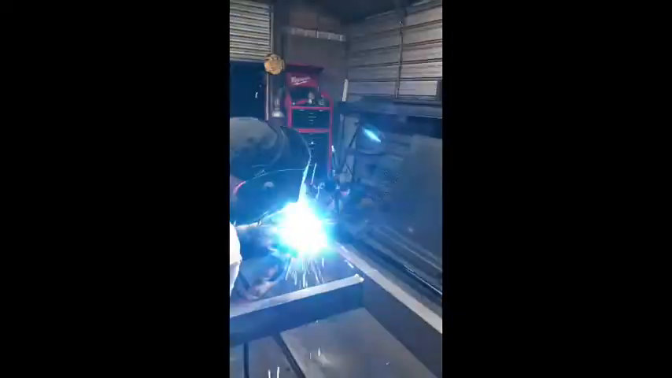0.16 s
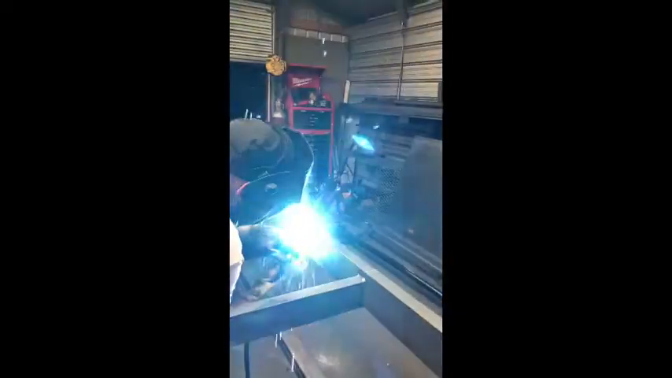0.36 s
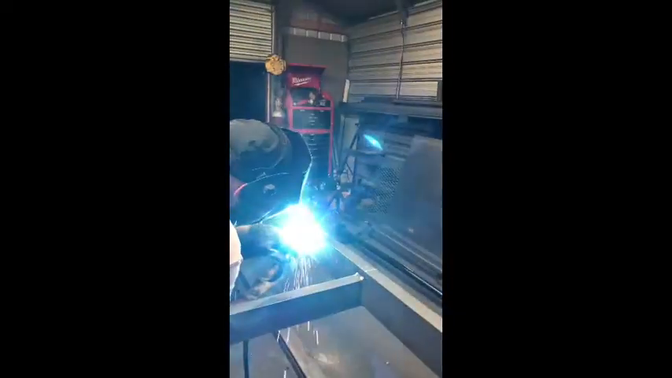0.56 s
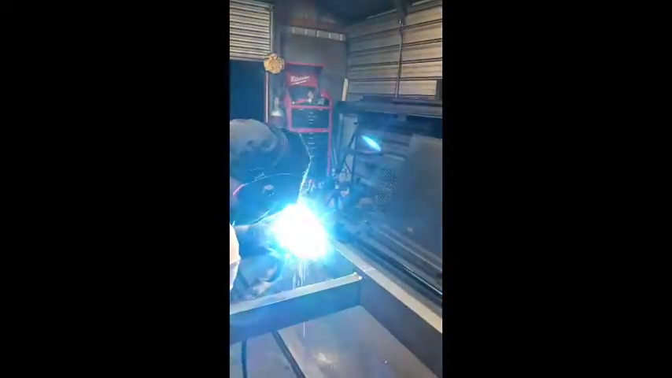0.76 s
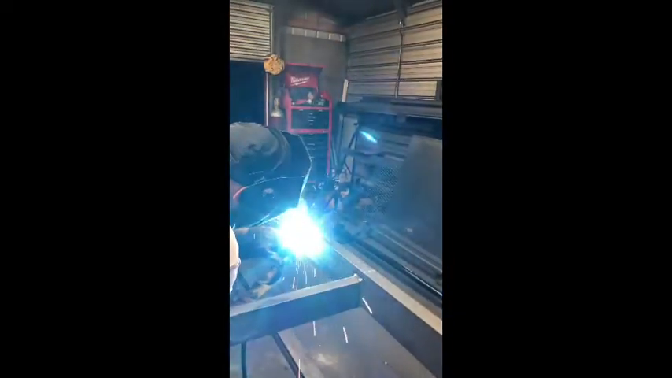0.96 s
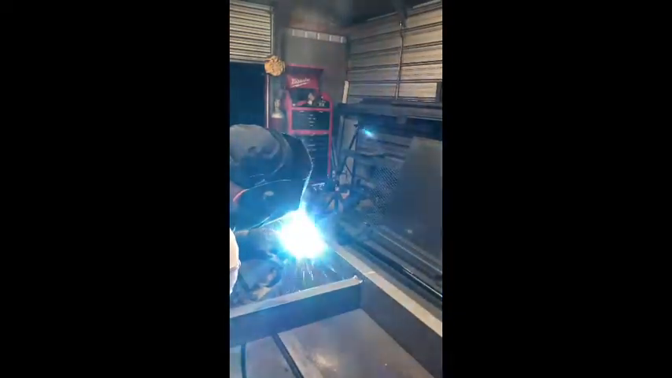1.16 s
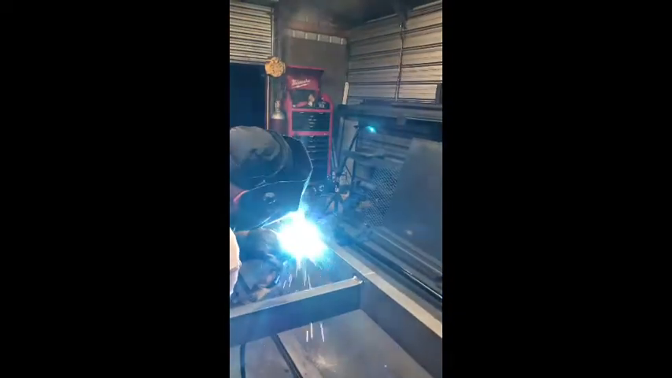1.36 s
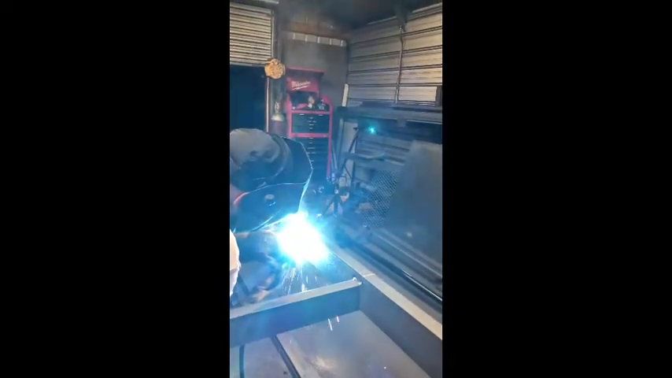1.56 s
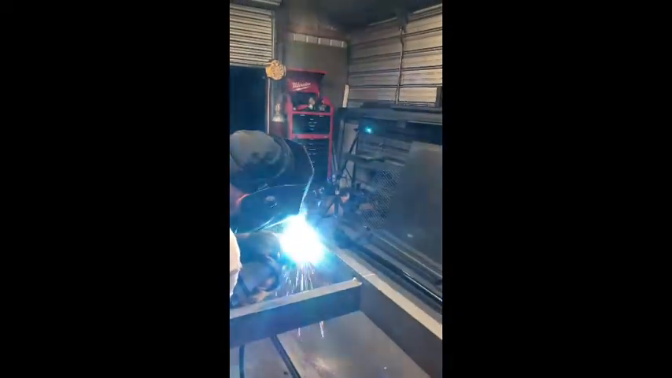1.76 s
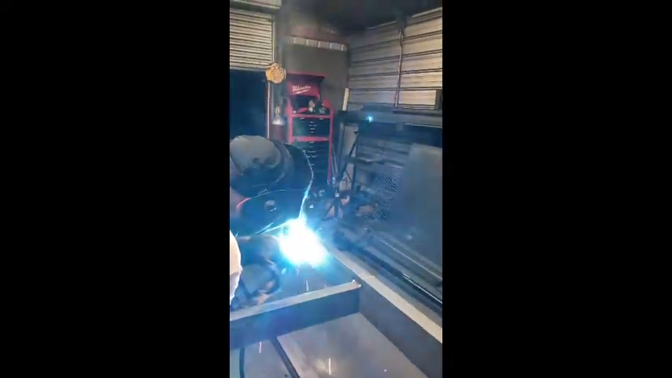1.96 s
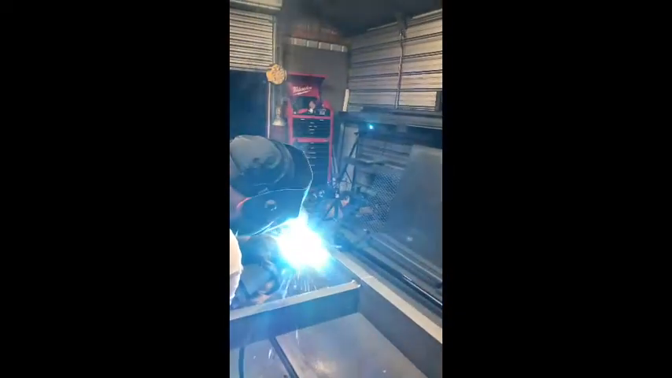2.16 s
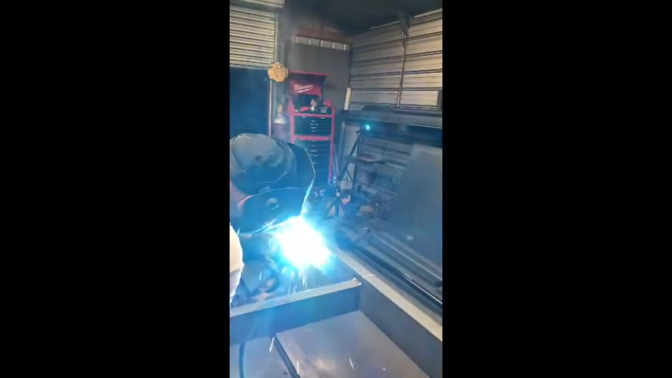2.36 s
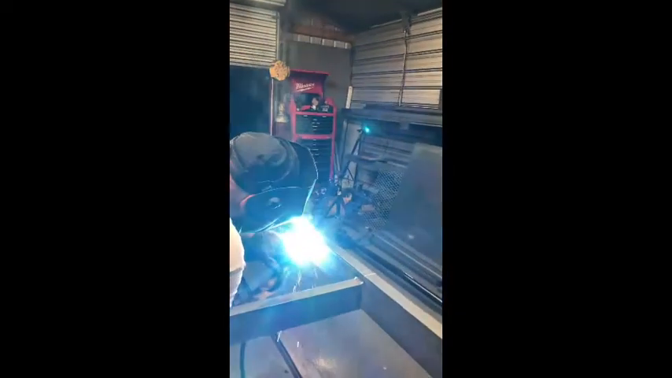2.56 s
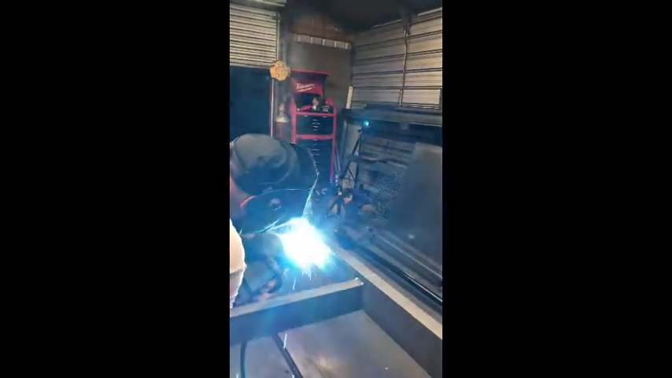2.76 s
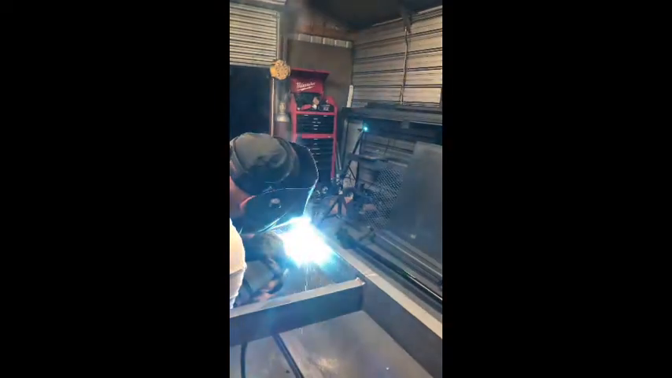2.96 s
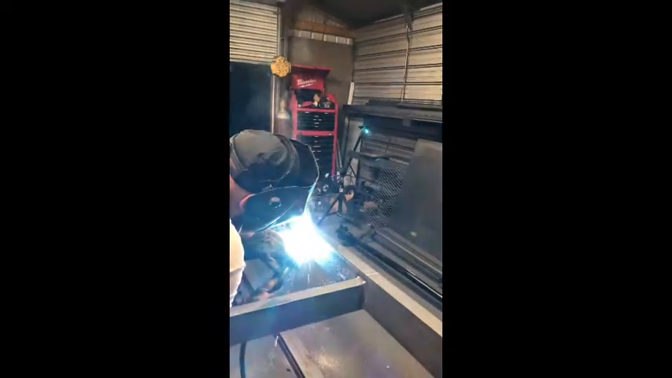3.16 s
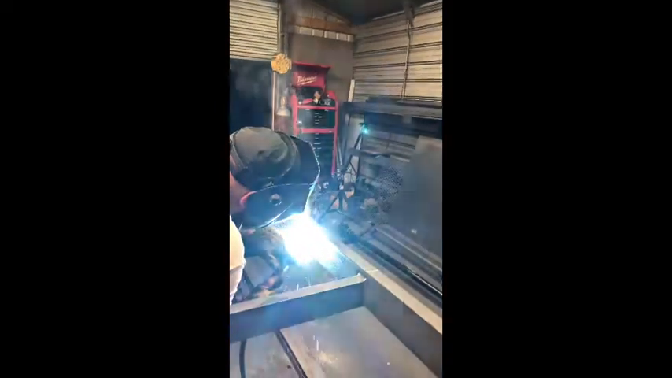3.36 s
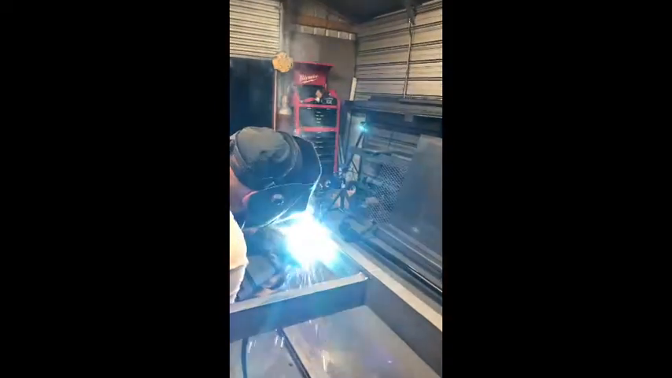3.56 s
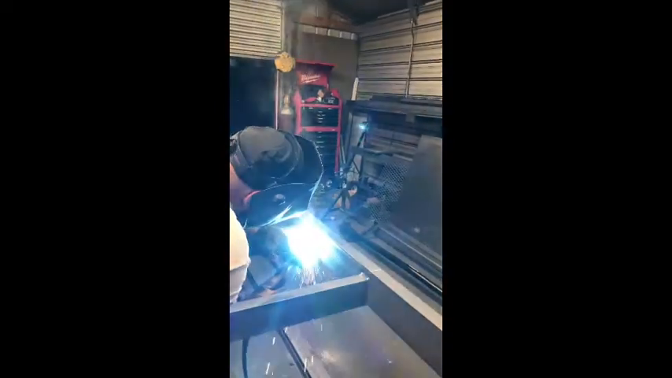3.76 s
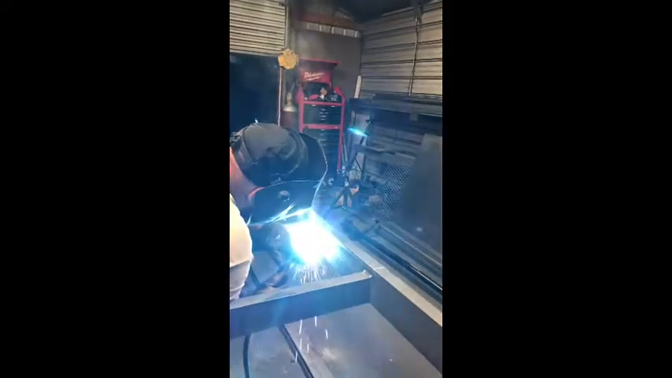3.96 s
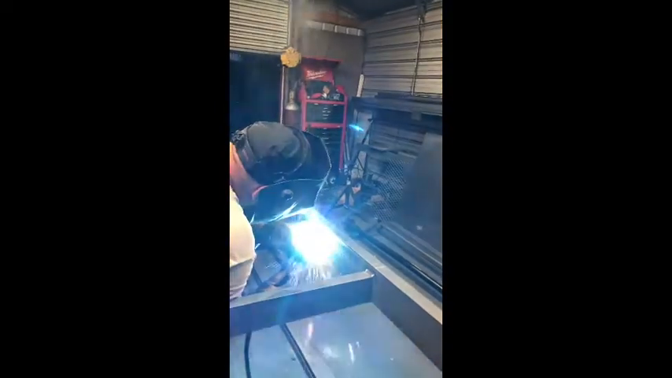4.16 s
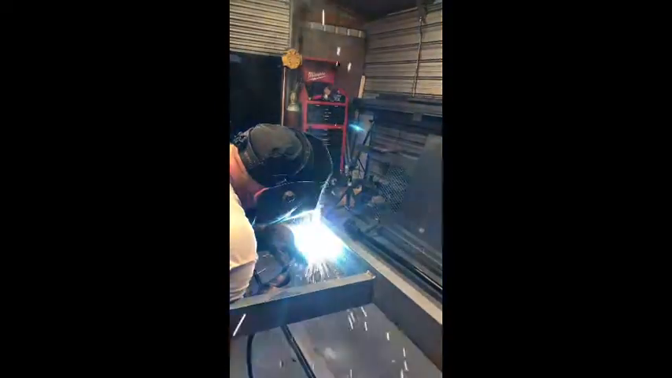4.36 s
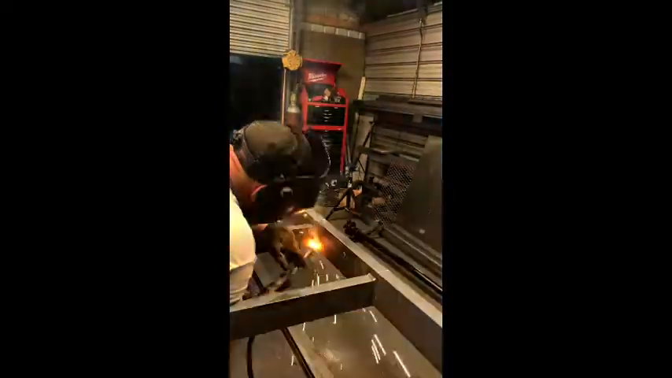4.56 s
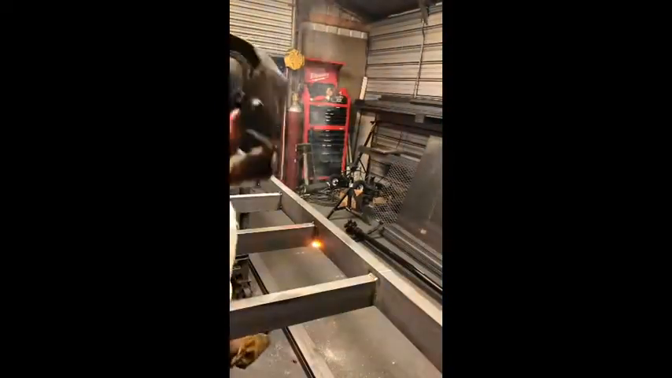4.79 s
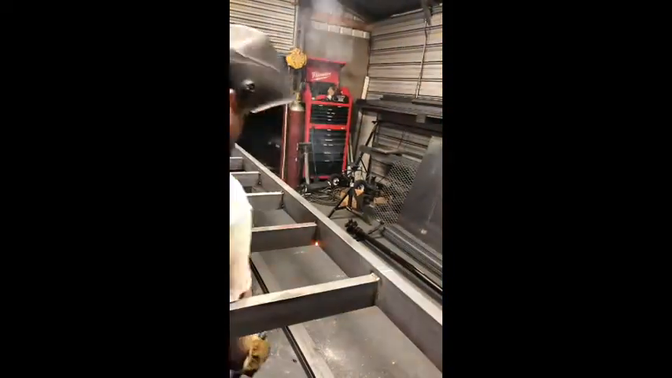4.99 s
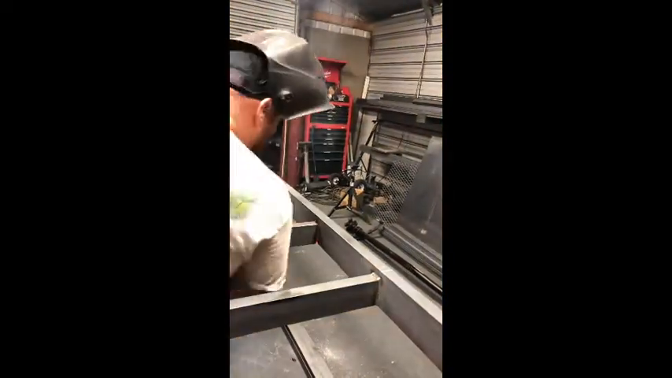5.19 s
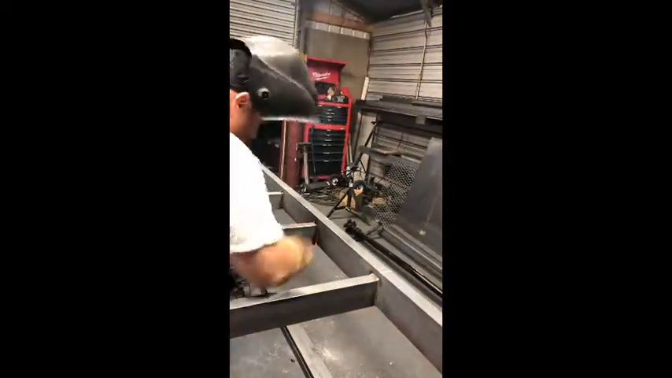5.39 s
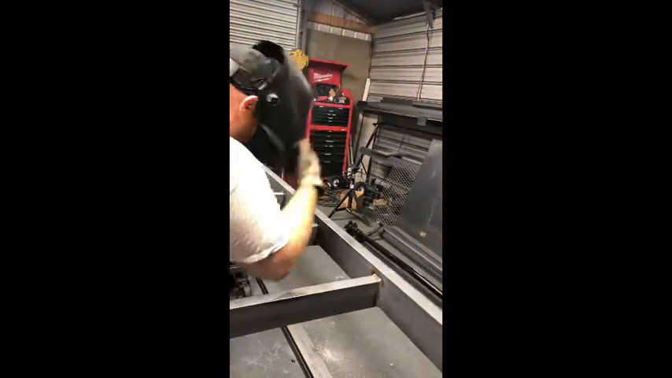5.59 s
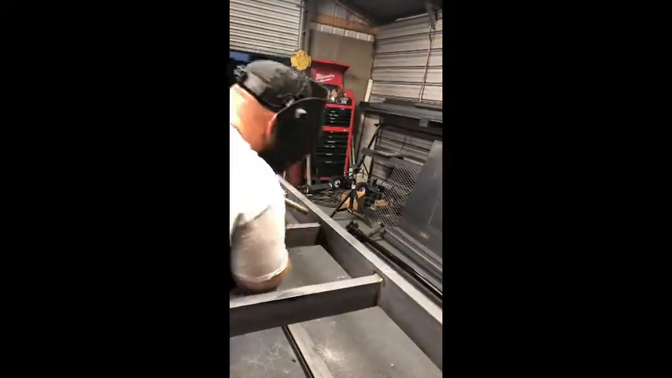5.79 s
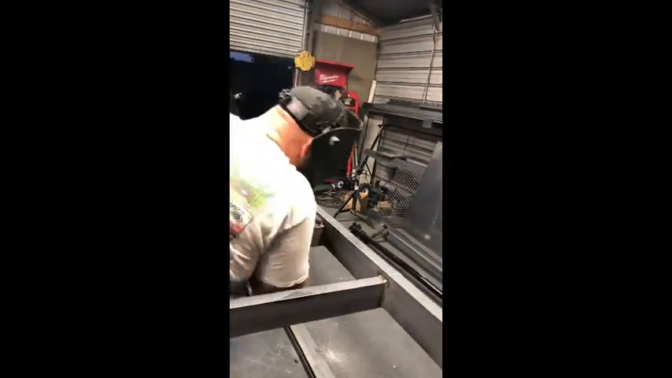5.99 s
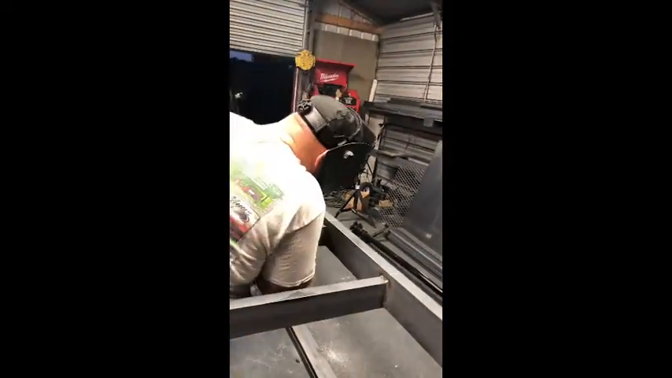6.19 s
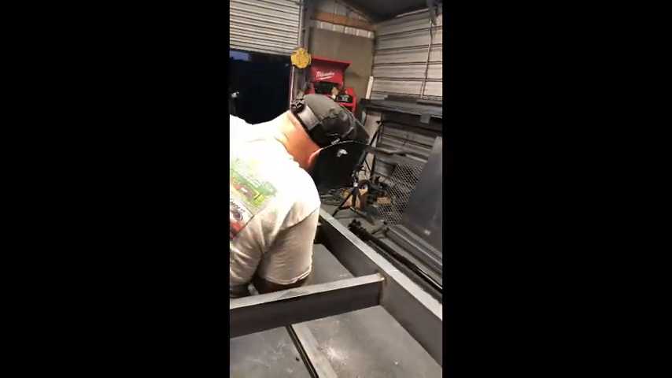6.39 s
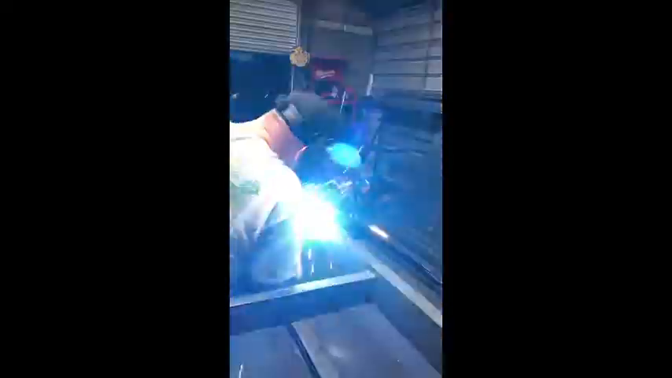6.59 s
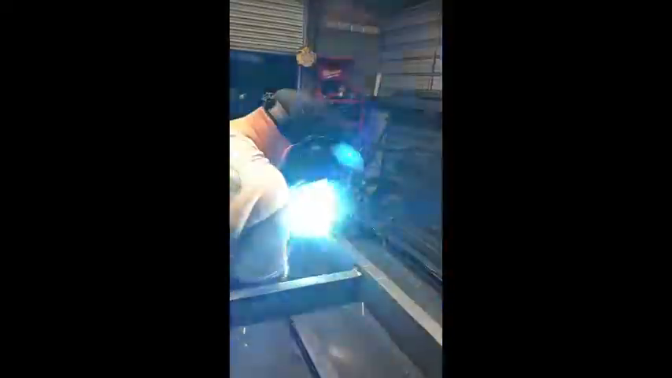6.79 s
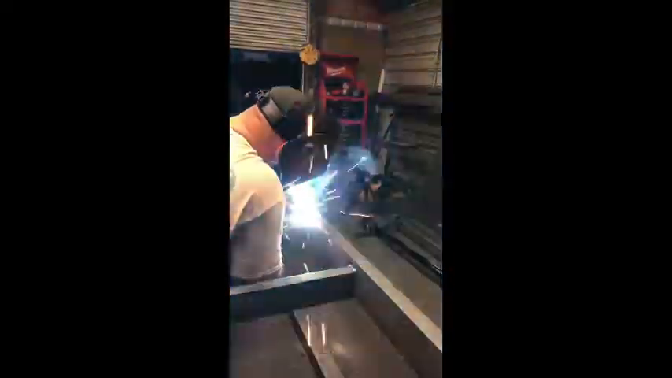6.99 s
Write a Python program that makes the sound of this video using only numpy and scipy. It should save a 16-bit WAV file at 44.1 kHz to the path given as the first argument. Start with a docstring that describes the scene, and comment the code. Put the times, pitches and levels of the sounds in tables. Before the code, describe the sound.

A welding arc is already burning on steel tubing at the start: a bright, dense sizzle with rapid, uneven pops and fine spatter, flaring and faltering slightly. A fan motor hums low underneath. Soft, dull bumps touch the microphone right at the start and at about 0.4 seconds. The crackle continues steadily, a little louder around 3 seconds, with another soft bump just before it stops at about 4.6 seconds. A brief puff of hiss follows at 4.7 seconds. In the pause, the fan's wavering hum and rush of air become more noticeable, and clothing rustles very faintly between 5 and 5.5 seconds. At about 6.5 seconds the arc strikes again and the hum recedes. This second weld sputters more unevenly and lasts until the end, around 7 seconds. The workshop adds a short, slight reverberation.

```python
"""MIG welding a steel frame

An arc sizzles along a joint of a tube frame in a workshop, stops, and strikes at another joint.
The wire shorts into the pool in quick uneven pops amid fine spatter, coloured by the steel around it.
A fan motor hums throughout, louder between the welds, and a few soft bumps reach the microphone.
A short hiss and faint rustles of clothing follow the first weld."""
import sys
import numpy as np
from scipy import signal
from scipy.fft import rfft, irfft, next_fast_len
from scipy.io import wavfile
from scipy.ndimage import map_coordinates

SR = 44100
rng = np.random.default_rng(int(sys.argv[2]) if len(sys.argv) > 2 else 0)


def generate_wav(signal):
    """Clip the signal to [-1, 1] and save it as 16-bit WAV at the path in sys.argv[1]."""
    frames = np.transpose(np.atleast_2d(signal))
    scaled = np.clip(frames, -1, 1) * 32767
    pcm = np.round(scaled).astype(np.int16)
    wavfile.write(sys.argv[1], SR, pcm)


N = 310464


def amp(db):
    """Decibels to gain."""
    return 10 ** (np.asarray(db) / 20)


def unit(x):
    """Scale to rms 1."""
    return x / np.sqrt(np.mean(x ** 2) + 1e-20)


def along(points, hz):
    """Interpolate (frequency, value) points on a log axis."""
    point_hz, values = np.transpose(points)
    return np.interp(np.log(hz + 1), np.log(point_hz), values)


def tracks(rows, t):
    """Interpolate (time, values...) rows: one curve per value column."""
    times_s, *columns = np.transpose(rows)
    return [np.interp(t, times_s, column) for column in columns]


def bell(t, sigma_s):
    """Gaussian of height 1 at t = 0."""
    return np.exp(-(t / sigma_s) ** 2 / 2)


def wobble(rate_hz):
    """Smooth random curve through rate_hz knots a second."""
    knots = rng.standard_normal(int(N * rate_hz / SR) + 4)
    return map_coordinates(knots, [np.arange(N) * rate_hz / SR])


def filtered(x, response):
    """Zero-phase filter with gain response(hz)."""
    size = next_fast_len(N + 8192)
    return irfft(rfft(x, size) * response(np.fft.rfftfreq(size, 1 / SR)), size)[..., :N]


def noise(spectrum):
    """Coloured noise, rms 1."""
    return unit(filtered(rng.standard_normal(N), lambda hz: amp(along(spectrum, hz))))


def clicks(rate_hz, scatter, spread_db, count):
    """Impulses of log-normal spacing and size, rms 1."""
    gap, size = rng.standard_normal((count, 2)).T
    periods = np.exp(scatter * gap - scatter ** 2 / 2)
    at = (np.cumsum(periods) * SR / rate_hz).astype(int)
    gains = amp(spread_db * np.minimum(size, 2))
    train = np.bincount(at[at < N], gains[at < N], N)
    return unit(train - train.mean())


def crackle(pop_db, hiss_db, flutter_db):
    """Short-circuit pops, fine spatter and arc hiss, all fluttering with the pool."""
    t = np.arange(SR // 50) / SR
    burst = rng.standard_normal(N)
    snaps = clicks(rate_hz=115, scatter=.45, spread_db=1.5, count=2000)
    # each snap is followed by a brief flare as the arc relights
    relight_t60_s = 0.014
    relight_power = signal.fftconvolve(np.maximum(snaps, 0) ** 2, amp(-60 * t / relight_t60_s) ** 2)[:N]
    pops = unit(0.43 * snaps + unit(np.sqrt(np.abs(relight_power)) * burst))
    spatter = clicks(rate_hz=2600, scatter=.8, spread_db=1.5, count=50000)
    mix = spatter + amp(pop_db) * pops + amp(hiss_db) * rng.standard_normal(N)
    return unit(mix * amp(flutter_db * wobble(36)))


# arc colour: (frequency [Hz], gain [dB])
ARC_SPECTRUM = [(60, -17), (200, -14.5), (350, -13), (600, -15), (1000, -8), (2000, -8.5), (3000, -2.5),
                (4500, -1), (7000, 1), (10000, 1.5), (12500, -3.5), (15500, -8)]
# peaks and hollows of the steel at each joint: (centre [Hz], width [Hz], gain [dB])
FIRST_JOINT = [(1095, 56, 4.5), (1496, 160, 8.5), (2050, 154, -4.5), (3315, 550, 6), (4115, 240, 5),
               (4680, 570, 9), (5900, 520, -2.5), (8110, 690, 3.5), (8970, 340, -2), (10410, 800, 4.5),
               (12150, 750, -2), (14300, 990, 5.5)]
SECOND_JOINT = [(1090, 130, -1.5), (1660, 120, 4.5), (2000, 160, -4.5), (3310, 150, 5), (4070, 170, 5.5),
                (4850, 350, 5.5), (7300, 490, 3), (8300, 300, 3), (9700, 450, 2.5)]
# torch travel: (time [s], peak tuning [ratio], peak strength [ratio], top fizz [dB])
FIRST_TORCH = [(0, 0.95, 0.71, 3), (0.9, 0.97, 0.97, 2), (1.7, 0.99, 1.13, 2.5), (2.6, 1.025, 0.93, -1.5),
               (3.4, 1.013, 1.02, -5.5), (4.0, 1.02, 0.56, 3.5), (4.55, 1.01, 0.78, 1.5)]
SECOND_TORCH = [(6.44, 1, 0.96, 3.8), (7.04, 0.98, 0.84, 2.5)]


def steel(x, joint, torch):
    """The joint colours the arc; its peaks shift and flatten as the torch travels."""
    hz, t, spectra = signal.stft(x, SR, nperseg=512)
    hz = hz[:, None]
    tuning, strength, fizz_db = tracks(torch, t)
    peaks_db = sum(db * np.exp(-((hz / tuning - centre_hz) / width_hz) ** 2)
                   for centre_hz, width_hz, db in joint)
    fizz_band = 1 / (1 + (12000 / (hz + 1)) ** 14)
    gain = amp(along(ARC_SPECTRUM, hz) + strength * peaks_db + fizz_band * fizz_db)
    return signal.istft(spectra * gain, SR, nperseg=512)[1][:N]


STRIKE_DB_PER_S, DIE_DB_PER_S = 640, 354
OVERSHOOT_DB, SETTLE_S = 5.8, 0.033
RASP_SWING, SPUTTER_SWING = 0.95, 0.66  # share of a flare, relative to the sizzle
# arc, strike to trigger release: (time [s], sizzle [dB], rasp [dB re sizzle], sputter [dB re sizzle])
FIRST_WELD = [(-0.02, -30, -4, -9.5), (0.8, -28, -5.8, -14.5), (2.0, -27.3, -3.5, -14.5),
              (2.08, -26.5, -2.5, -13.5), (3.26, -25, -4, -16), (3.33, -27.5, -5.5, -15),
              (4.0, -28, -4.5, -18), (4.22, -27.5, -3.5, -13), (4.555, -29, -4.7, -13.5)]
SECOND_WELD = [(6.486, -29.5, -7, -12.5), (7.04, -30.5, -3.5, -14)]
# arc flares (+) and falters (-): (time [s], gain [dB], sigma [s])
FLARES = [(0.113, -2.5, .02), (0.18, 1.5, .02), (0.247, -1.5, 0.018), (0.394, 4, 0.0062),
          (1.388, -2.5, 0.014), (1.46, 2.5, 0.034), (1.615, -2.5, 0.0092), (2.25, 2, 0.017),
          (2.392, -1, 0.018), (2.45, 2, 0.011), (3.123, 1, .025), (4.078, 3.5, 0.0056), (6.59, 1.5, 0.026),
          (6.728, -4.5, 0.057), (6.892, 2.3, .022), (6.945, -4.5, 0.023)]


def weld(levels, joint, torch):
    """The arc strikes, settles, flares, falters and dies: high sizzle, mid rasp, low sputter."""
    arc = steel(crackle(pop_db=-9.5, hiss_db=3.5, flutter_db=0.5), joint, torch)
    low = filtered(arc, lambda hz: 1 / (1 + (hz / 2300) ** 12))
    high = filtered(arc, lambda hz: 1 - 1 / (1 + (hz / 6000) ** 12))
    t = np.arange(N) / SR
    strike_s, stop_s = levels[0][0], levels[-1][0]
    level_db, rasp_db, sputter_db = tracks(levels, t)
    gate_db = -STRIKE_DB_PER_S * np.maximum(strike_s - t, 0) - DIE_DB_PER_S * np.maximum(t - stop_s, 0)
    flare_db = OVERSHOOT_DB * np.exp(-np.maximum(t - strike_s, 0) / SETTLE_S) + 0.27 * wobble(21.9)
    flare_db += sum(db * bell(t - at_s, sigma_s) for at_s, db, sigma_s in FLARES)
    surge = wobble(40)
    sizzle = amp(flare_db) * unit(high)
    rasp = amp(rasp_db + RASP_SWING * flare_db + 0.69 * surge) * unit(arc - low - high)
    sputter = amp(sputter_db + SPUTTER_SWING * flare_db + 1.06 * surge) * unit(low)
    return amp(level_db + gate_db) * (sizzle + rasp + sputter)


# workshop reverberation: (frequency [Hz], T60 [s])
SHOP_DECAY = [(200, 0.47), (2000, 0.31), (6000, 0.16), (15000, 0.21)]


def workshop(x, wet_db, segments):
    """Short room tail, treble dying first; drawn afresh per segment so it stays smooth, without ringing."""
    wet = np.zeros(N + SR)
    for segment in np.array_split(np.arange(N), segments):
        hz, t, spectra = signal.stft(rng.standard_normal(SR // 4), SR, nperseg=256)
        decay = amp(-60 * t / along(SHOP_DECAY, hz)[:, None])
        tail = signal.istft(spectra * decay, SR, nperseg=256)[1]
        reflections = signal.fftconvolve(x[segment], tail / np.linalg.norm(tail))
        wet[segment[0]:][:len(reflections)] += reflections
    return (x + amp(wet_db) * wet[:N]) / np.hypot(1, amp(wet_db))


HUM_HZ, HUM_DB, AIR_DB, FAN_SWELL_DB_PER_S = 137.8, -38.5, -44, 0.28
HUM_SINK_DB, AIR_SINK_DB, SINK_LAG_S, SINK_S, RETURN_S = 9, 5, .03, 0.063, 0.089
DIP_DB, DIP_LAG_S, DIP_SIGMA_S = 5.5, 0.058, 0.045
# fan air noise: (frequency [Hz], relative density [dB])
AIR_SPECTRUM = [(25, -44), (50, -17), (75, -4.5), (100, 4), (155, 8), (175, -0.5), (280, -1.5), (370, -8),
                (750, -7.5), (900, -8), (1400, -11), (2400, -17), (4500, -22.5), (8000, -31),
                (15500, -40.5)]


def fan():
    """Wavering motor hum in a rush of air; both sink while the arc burns and dip after a bump."""
    t = np.arange(N) / SR
    first_stop_s = FIRST_WELD[-1][0]
    sunk = np.zeros(N)
    for levels in (FIRST_WELD, SECOND_WELD):
        strike_s, stop_s = levels[0][0], levels[-1][0]
        onset = np.clip((t - strike_s - SINK_LAG_S) / SINK_S, 0, 1)
        sunk += onset * np.exp(-np.maximum(t - stop_s, 0) / RETURN_S)
    sunk[t < first_stop_s] = 1  # first weld already under way
    dip = sum(bell(t - at_s - DIP_LAG_S, DIP_SIGMA_S) for at_s, *_ in BUMPS)
    level_db = FAN_SWELL_DB_PER_S * (t - first_stop_s) - DIP_DB * dip
    phase = 2 * np.pi * HUM_HZ * t + 0.23 * wobble(8.3)
    hum = amp(HUM_DB - HUM_SINK_DB * sunk + 1.4 * wobble(15)) * unit(np.sin(phase))
    air = amp(AIR_DB - AIR_SINK_DB * sunk) * noise(AIR_SPECTRUM)
    return amp(level_db) * (hum + air)


SCUFF_LEAD_S, SCUFF_SIGMA_S = 0.0064, .011
PUSH_DB, PUSH_SIGMA_S = 8, 0.002
RUMBLE_DB, RUMBLE_SIGMA_S, RUMBLE_HZ = -6.5, .023, 139
# soft bumps at the microphone: (time [s], level [dB], scuff corner [Hz], push share [0-1])
BUMPS = [(0.042, -31.5, 640, 0.05), (0.363, -26, 660, 1), (0.381, -37, 450, 0.2), (3.269, -50, 90, 0),
         (4.463, -33, 640, 0.55), (6.562, -41, 130, 0)]


def bumps():
    """Dull, ringless thuds: a scuff leads into one push and pull of pressure, inside a low rumble."""
    out = np.zeros(N + SR)
    t = np.arange(-SR // 10, SR // 10) / SR

    def dull_burst(envelope, corner_hz):
        """Low noise band, rms 1 at the envelope's peak."""
        sos = signal.butter(3, [35, corner_hz], "bandpass", fs=SR, output="sos")
        band = signal.sosfilt(sos, rng.standard_normal(len(t)))
        return unit(envelope * band) * np.sqrt(np.mean(envelope ** 2))

    push = -np.sqrt(2) * t / PUSH_SIGMA_S * bell(t, PUSH_SIGMA_S)
    for at_s, db, corner_hz, share in BUMPS:
        scuff = dull_burst(bell(t + SCUFF_LEAD_S, SCUFF_SIGMA_S), corner_hz)
        rumble = dull_burst(bell(t, RUMBLE_SIGMA_S), RUMBLE_HZ)
        thud = scuff + amp(RUMBLE_DB) * rumble + share * amp(PUSH_DB) * push
        out[round(at_s * SR):][:len(t)] += amp(db) * thud
    return out[SR // 10:][:N]


PUFF_PEAK_S, PUFF_DB, PUFF_RISE_DB_PER_S, PUFF_FALL_DB_PER_S = 4.733, -42, 648, 320
# hiss after the first weld: (frequency [Hz], relative density [dB])
PUFF_SPECTRUM = [(200, -23), (480, 8), (1500, -4), (2500, -7), (5000, -3), (9000, -6), (13500, -7.5),
                 (15500, -18)]


def puff():
    """Brief hiss once the arc is out."""
    t = np.arange(N) / SR - PUFF_PEAK_S
    envelope_db = np.minimum(PUFF_RISE_DB_PER_S * t, -PUFF_FALL_DB_PER_S * t)
    return amp(PUFF_DB + envelope_db) * noise(PUFF_SPECTRUM)


# clothing rustles: (time [s], level [dB], centre [Hz], sigma [s])
RUSTLES = [(5.09, -69, 11000, .05), (5.33, -69, 7000, .035), (5.41, -60, 5000, .02)]


def rustles():
    """Clothing shifts as the welder sits up: faint swells of high noise."""
    t = np.arange(N) / SR
    return sum(amp(db) * bell(t - at_s, sigma_s) * noise([(hz / 2, -15), (hz, 0), (hz * 2, -15)])
               for at_s, db, hz, sigma_s in RUSTLES)


def scene():
    """Both welds in the workshop, with the fan and small noises, in mono."""
    welds = weld(FIRST_WELD, FIRST_JOINT, FIRST_TORCH) + weld(SECOND_WELD, SECOND_JOINT, SECOND_TORCH)
    mono = workshop(welds, wet_db=-12, segments=20) + puff() + rustles() + fan() + bumps()
    return np.array([mono, mono])


def record(dry):
    """Steep low-pass band limit."""
    top_hz = 15750
    return filtered(dry, lambda hz: 1 / (1 + (hz / top_hz) ** 500))


dry = scene()
out = record(dry)
generate_wav(out)
```